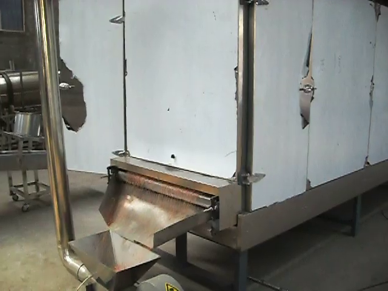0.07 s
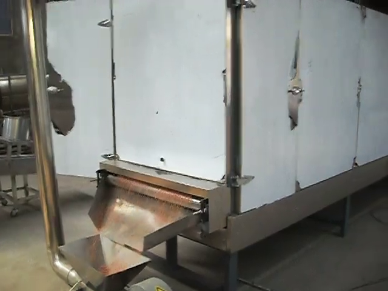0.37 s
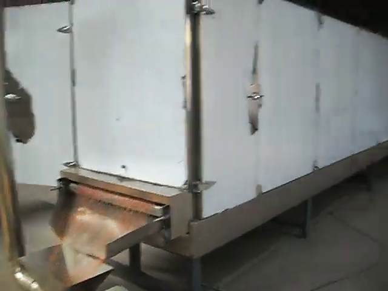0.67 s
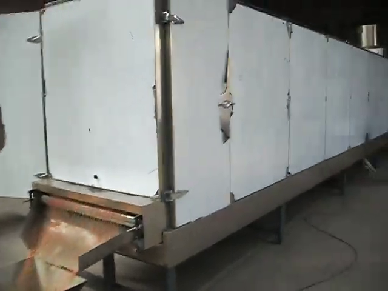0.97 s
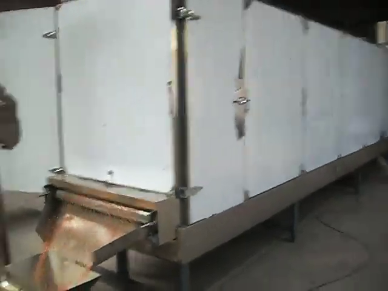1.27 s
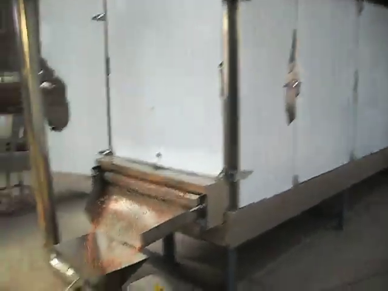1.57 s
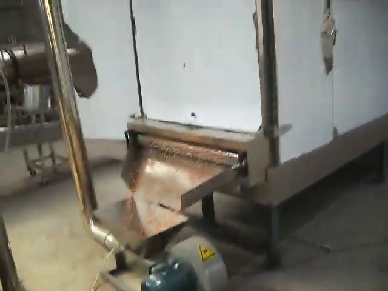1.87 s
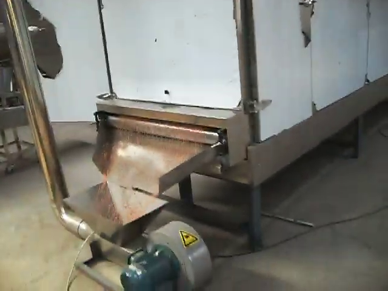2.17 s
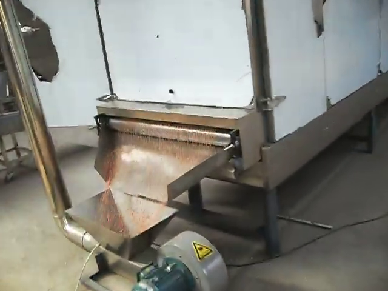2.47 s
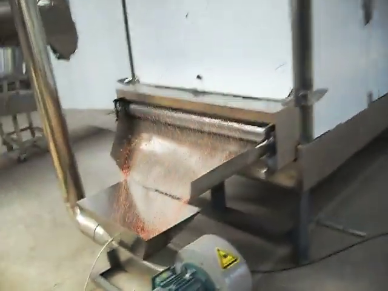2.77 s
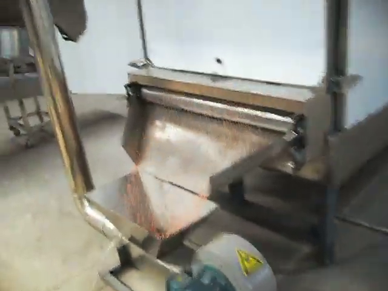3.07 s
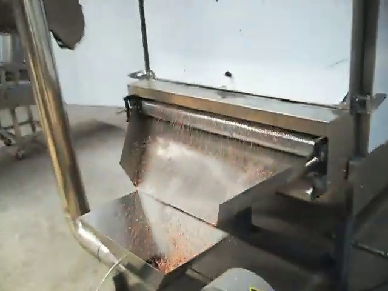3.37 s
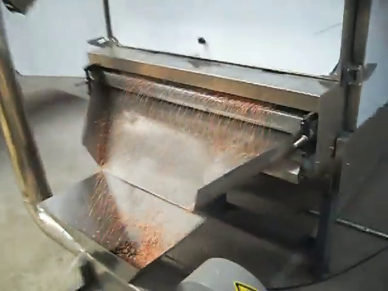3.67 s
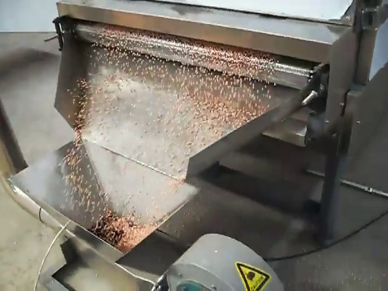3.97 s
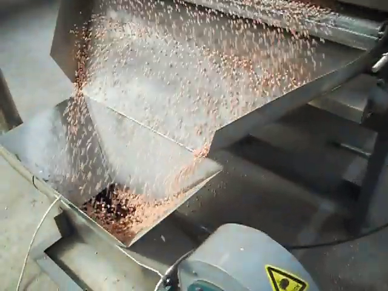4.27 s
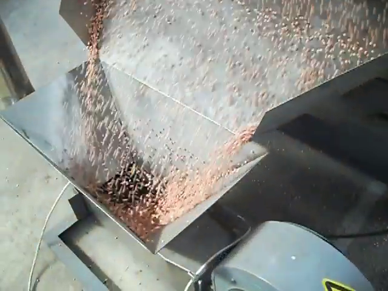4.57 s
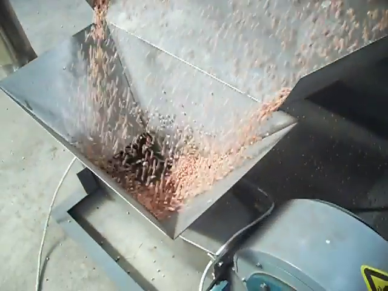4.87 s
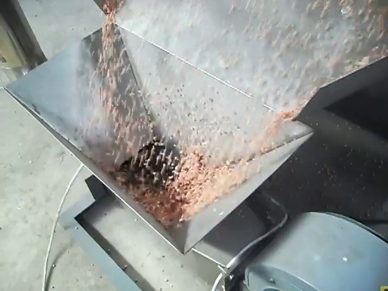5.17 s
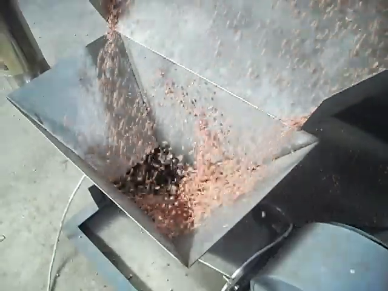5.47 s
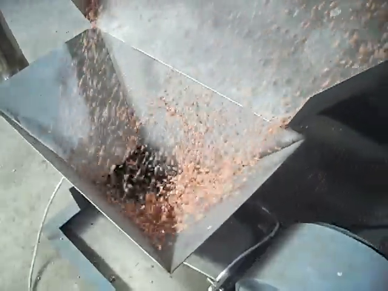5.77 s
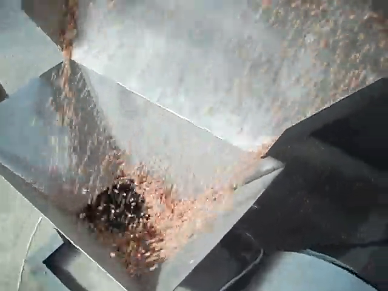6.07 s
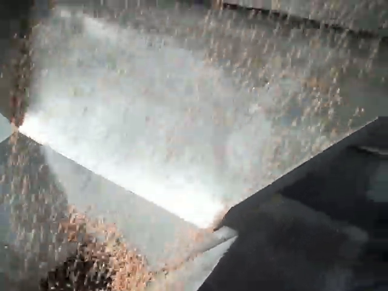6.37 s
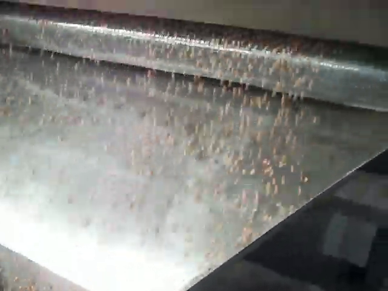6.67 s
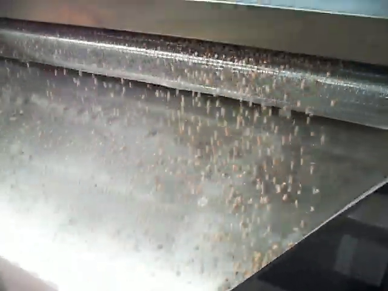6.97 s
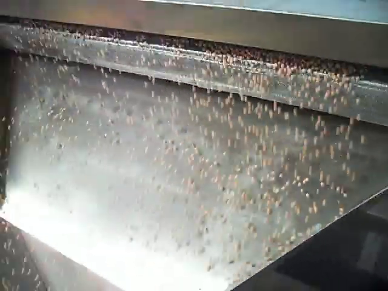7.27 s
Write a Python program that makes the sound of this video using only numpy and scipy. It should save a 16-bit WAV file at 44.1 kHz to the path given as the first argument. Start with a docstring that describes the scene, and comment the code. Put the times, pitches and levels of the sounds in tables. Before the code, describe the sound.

After silence, the sound opens quietly at about 0.5 seconds with a brief low hum, running machinery and small dry pellets pouring down a steel chute. It reaches full level by about 1.4 seconds and continues to the end, a little past 7 seconds.

The pour dominates: thousands of tiny bright ticks merge into a steady, hissing patter, with sheet steel clattering and the hopper ringing, blurred by a factory hall. Beneath it, a dryer rumbles with wavering motor tones and a blower drones with an uneven throb. Steel panels give soft low booms around 2 seconds, several times between 4.7 and 5.7, and at 6.7. Occasional clumps briefly thicken the stream.

The single microphone moves closer from about 2.3 seconds, reaches the hopper at 6 and turns toward the chute. The rumble eases slightly and the blower grows, while the pour stays nearly even.

```python
"""A factory hall, one microphone carried from beside a dryer up to a steel hopper.
Half a second in, the input opens quietly on a brief hum, the dryer's rumble, a blower's drone and dry
pellets pouring down a steel chute, thousands a second. Each ticks and sets the sheet steel clattering,
blurred by the hall. The level is full by 1.4 s; from about 2 s the panels give an occasional soft boom.
The microphone then moves in, reaches the hopper at 6 s and turns to the chute, shifting the balance."""
import sys
import numpy as np
from scipy import signal
from scipy.fft import rfft, irfft
from scipy.io import wavfile

SR = 44100
rng = np.random.default_rng(int(sys.argv[2]) if len(sys.argv) > 2 else 0)


def file_out(sig):
    """Save sig as 16-bit WAV at sys.argv[1]."""
    # one column per channel
    cols = np.atleast_2d(sig).T
    # limit, then scale
    lim = np.clip(cols, -1, 1)
    pcm = np.round(lim * 32767).astype(np.int16)
    wavfile.write(sys.argv[1], SR, pcm)


N = 327663
TIME = np.arange(N) / SR
HZ = np.fft.rfftfreq(N, 1 / SR)

# The walk up to the hopper. Each row: time in seconds, nearness from 0 (far) to 1 (close).
NEARNESS = [(2.3, 0.13), (3.8, 0.34), (4.2, 0.52), (4.9, 0.88), (6, 1), (7.2, .9)]
# The microphone swings to the chute. Each row: time in seconds, share of the turn from 0 to 1.
TURN = [(6.3, 0.03), (6.75, 0.9)]
# The spectrum of the dryer's body. Each row: frequency in Hz, relative level in dB.
RUMBLE_SPECTRUM = [(40, -22), (70, -10.5), (105, -7), (145, -4), (190, 0), (260, -1), (325, -3.5),
                   (420, -12.5), (520, -16.5), (900, -24)]
# The dryer's motor tones. Each row: pitch in Hz, width in Hz, level in dB against the rumble.
MOTOR_TONES = [(124.7, 5.6, -12.5), (165.6, 5, -11.5), (189.8, 4, -13.5), (202, 5, -14)]
# The dryer as heard along the walk. Each row: time in seconds, level of the rumble in dB.
DRYER_LEVEL = [(.6, -33), (1.2, -34.5), (1.7, -33), (2.8, -36), (3.7, -35), (4.2, -37.5), (7.3, -37.5)]
# The blower's resonances. Each row: pitch in Hz, width in Hz, relative level in dB.
BLOWER_TONES = [(343, 10, -16), (361, 17, -5.5), (376, 5, -15.5), (401, 36, -8), (778, 6.9, -14.5),
                (962, 17, -15.5)]
# The hall's deep room tone. Each row: pitch in Hz, width in Hz, level in dB.
HALL_TONES = [(28, 13, -58), (44, 15, -49), (86, 16, -50)]
# A pellet's tick. Each row: frequency in Hz, relative level in dB from afar, the same close up.
TICK_SPECTRA = [(2960, -34, -39), (4430, -6.5, -8), (5400, -2, -3.5), (6950, -1.5, -2), (8250, 1.7, 1.1),
                (9300, 3, 2.5), (10000, 2.5, 5), (10260, 1.5, 1.5), (12500, -7.5, -7.5)]
# The chute's clatter. Each row: frequency in Hz, relative level in dB from afar, the same close up.
CLATTER_SPECTRA = [(200, -22, -8.5), (463, -7.5, -3), (684, -6.5, -7), (860, -6, -4), (1080, -4.5, -5),
                   (1360, -5.5, -4), (1750, -0.7, -0.6), (2100, -1.4, -1.8), (2300, 0, -1.3),
                   (3150, -0.4, 2.5), (4410, 1.5, -1), (5270, -6, -7), (7500, -23, -19)]
# The hopper's resonances. Each row: pitch in Hz, width in Hz, relative level in dB.
HOPPER_MODES = [(1400, 59, -13), (2213, 40, -11), (3590, 580, 0), (3920, 350, -.5)]
# Larger clumps landing together. Each row: time in seconds, rise of the pour in dB.
CLUMPS = [(1.5, 0.5), (2.68, 1.2), (4.69, 2.5), (5.65, 1.5), (6.6, 2.5), (6.7, 2.5), (7.25, 1)]
# Soft booms of the sheet steel. Each row: time in seconds, pitch in Hz, peak level in dB.
BOOMS = [(1.94, 215, -34), (2.36, 200, -34), (4.66, 350, -35), (4.89, 365, -31), (5.09, 380, -33.5),
         (5.11, 180, -35), (5.65, 300, -36), (6.7, 365, -33)]
# The stream hits harder. Each row: time in seconds, half length in seconds, rise of the ring in dB.
HARDER_HITS = [(2.36, .17, 4), (3.7, .3, 1.5), (6.1, .4, 1.5)]
# The microphone's top treble. Each row: frequency in Hz, gain in dB.
MIC_RESPONSE = [(10200, 0.5), (10600, -2.5), (11050, -15), (11500, -8), (11850, -10.5), (12400, -30)]
# The input fader coming up. Each row: time in seconds, gain in dB.
FADE_IN = [(.53, -11.5), (.86, -12), (1.0, -5.8), (1.15, -3), (1.35, -0.5)]


def gain_of(db):
    """Decibels to amplitude."""
    return 10 ** (np.asarray(db) / 20)


def evened(x):
    """Scales to rms 1."""
    return x / np.sqrt(np.mean(x ** 2) + 1e-20)


def response(points):
    """The gain at every frequency, joining (Hz, dB) points on a log-frequency axis."""
    hz, db = np.transpose(points)
    return gain_of(np.interp(np.log(HZ + 1), np.log(hz + 1), db))


def curve(rows):
    """Joins (seconds, value) points, sample by sample."""
    return np.interp(TIME, *np.transpose(rows))


def coloured(x, gain):
    """Filters x by a gain for each frequency; rms 1."""
    return evened(irfft(rfft(x) * gain, N))


def resonance(hz, width):
    """The gain of one resonance at every frequency."""
    return 1 / (1 + ((HZ - hz) / (0.78 * width)) ** 2)


def tones(rows):
    """Narrow resonances stirred by turbulence: tones that waver in level and pitch."""
    return sum(gain_of(db) * coloured(rng.standard_normal(N), resonance(hz, width))
               for hz, width, db in rows)


def wavering(hz):
    """Slow random drift up to about this rate; rms 1."""
    return coloured(rng.standard_normal(N), 1 / (1 + (HZ / hz) ** 2))


def swell(s, half_length_s):
    """A smooth rise to 1 and fall around one moment."""
    return np.exp(-((TIME - s) / half_length_s) ** 2)


def mic_gain(far_db, closer_db, turned_db):
    """A source's gain from afar, plus what walking closer and turning to the chute add."""
    return gain_of(far_db + closer_db * curve(NEARNESS) + turned_db * curve(TURN))


def approached(x, spectra):
    """Colours x by a far and a near spectrum, blended as the microphone moves in."""
    near = curve(NEARNESS)
    hz, far_db, near_db = np.transpose(spectra)
    far_sound = coloured(x, response(np.c_[hz, far_db]))
    near_sound = coloured(x, response(np.c_[hz, near_db]))
    return (1 - near) * far_sound + near * near_sound


def hum(pitch_hz=257, hold_until_s=0.77, fall_db_per_s=200):
    """One clean low tone that holds as the input opens, then dies away."""
    level_db = -33 - fall_db_per_s * np.maximum(TIME - hold_until_s, 0)
    return gain_of(level_db) * evened(np.sin(2 * np.pi * pitch_hz * TIME))


def dryer():
    """The dryer's body rumbles and its motors sing, fainter as the microphone leaves them."""
    rumble = coloured(rng.standard_normal(N), response(RUMBLE_SPECTRUM))
    return gain_of(curve(DRYER_LEVEL)) * (rumble + tones(MOTOR_TONES))


def blower(throb_db=2, throb_hz=5):
    """The blower beside the hopper drones and throbs unevenly, louder close up."""
    drone = tones(BLOWER_TONES) * mic_gain(-44, closer_db=5.3, turned_db=1.2)
    return drone * gain_of(throb_db * wavering(throb_hz))


def impacts(per_s, spread_db):
    """The energy of pellets that land at random moments with random force."""
    force = gain_of(spread_db * np.minimum(rng.standard_normal(N), 2))
    return force ** 2 * (rng.random(N) < per_s / SR)


def ringing(energy, t60):
    """Every impact sets off its own burst of dense vibration, falling 60 dB in t60 seconds."""
    energy_decay = 10 ** (-6 * TIME[:SR] / t60)
    envelope = np.sqrt(abs(signal.fftconvolve(energy, energy_decay)[:N]))
    return evened(rng.standard_normal(N) * envelope)


def hall_wash(energy, wet_db=-4):
    """The diffuse wash that walls and machine panels return."""
    return gain_of(wet_db) * ringing(energy, t60=0.98)


def pellet_ticks(energy):
    """Each hard contact gives a bright tick, with the hall behind it."""
    contacts = ringing(energy, t60=0.0085) + hall_wash(energy)
    return mic_gain(1.11, closer_db=-0.1, turned_db=-0.4) * approached(contacts, TICK_SPECTRA)


def chute_clatter(energy):
    """The chute's sheet steel flexes briefly under each pellet, with the hall behind it."""
    flexing = ringing(energy, t60=0.013) + hall_wash(energy)
    return mic_gain(-5.5, closer_db=-2, turned_db=0.95) * approached(flexing, CLATTER_SPECTRA)


def hopper_ring(energy):
    """Short blows ring the hopper at its resonances."""
    blows = ringing(energy, t60=0.0028)
    modes = sum(gain_of(db) * coloured(blows, resonance(hz, width)) for hz, width, db in HOPPER_MODES)
    return mic_gain(-10.5, closer_db=-2, turned_db=-2.4) * evened(modes)


def pour(level_db=-21, waver_db=0.42, clumping_db=0.07, clatter_share=0.19):
    """One stream of pellets drives tick, clatter and ring; it wavers, clumps and at times hits harder."""
    energy = impacts(per_s=13000, spread_db=2)
    harder_db = sum(db * swell(s, half_length_s) for s, half_length_s, db in HARDER_HITS)
    ticks = pellet_ticks(energy)
    clatter = gain_of(clatter_share * harder_db) * chute_clatter(energy)
    ring = gain_of(harder_db) * hopper_ring(energy)
    flow_db = level_db + waver_db * wavering(hz=5.5) - clumping_db * wavering(hz=25)
    large_clumps_db = sum(db * swell(s, half_length_s=0.0094) for s, db in CLUMPS)
    return gain_of(flow_db + large_clumps_db) * (ticks + clatter + ring)


def panel_booms(half_length_s=0.022):
    """Large steel panels swell and fade at one low pitch, for a few cycles."""
    return sum(gain_of(db) * swell(s, half_length_s) * np.sin(2 * np.pi * (hz * TIME + rng.random()))
               for s, hz, db in BOOMS)


def scene():
    """The pour over the machines and the room tone, in mono at the moving microphone."""
    return (pour() + dryer() + blower() + tones(HALL_TONES) + hum() + panel_booms())[None]


def record(dry, switch_on_s=0.5275, band_limit_hz=12480):
    """The microphone dulls the top treble; the band-limited input switches on and fades up."""
    at_mic = irfft(rfft(dry) * response(MIC_RESPONSE), N)
    fader = gain_of(curve(FADE_IN)) * (TIME > switch_on_s)
    low_pass = signal.firwin(511, band_limit_hz, window=("kaiser", 9), fs=SR)
    return signal.oaconvolve(at_mic * fader, low_pass[None], "same")


dry = scene()
out = record(dry)
file_out(out)
```